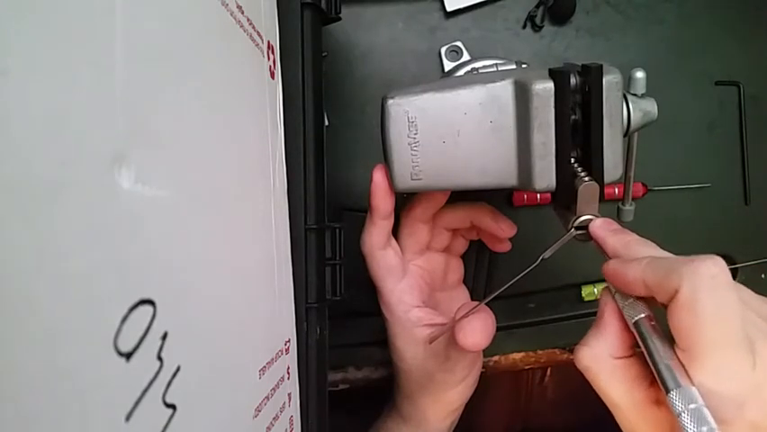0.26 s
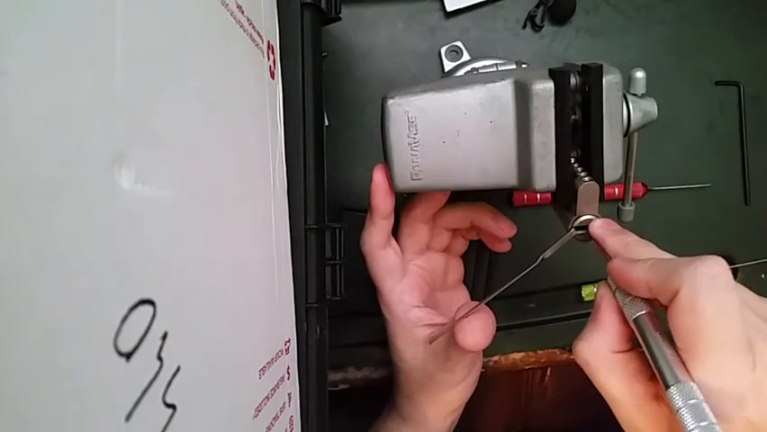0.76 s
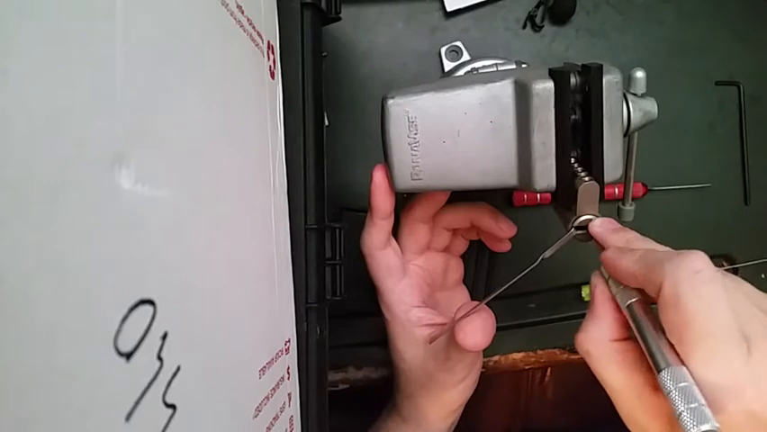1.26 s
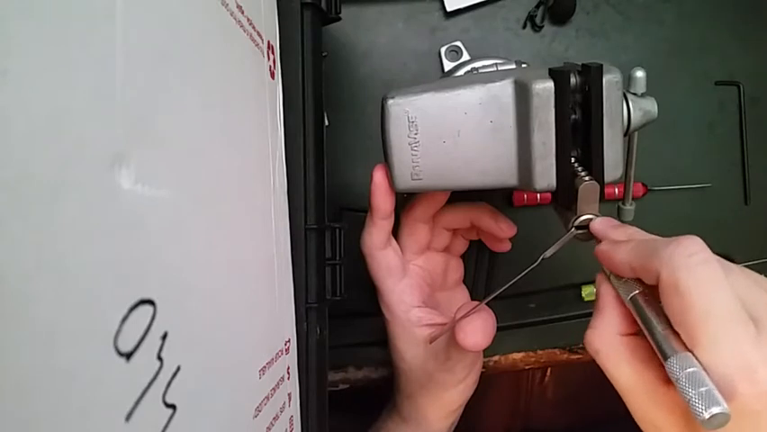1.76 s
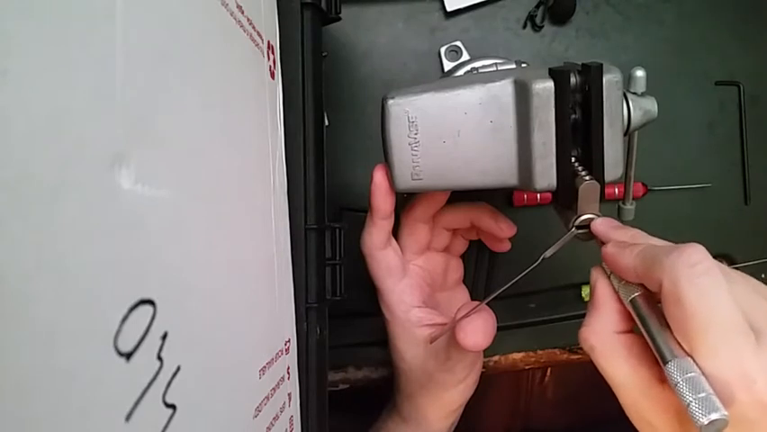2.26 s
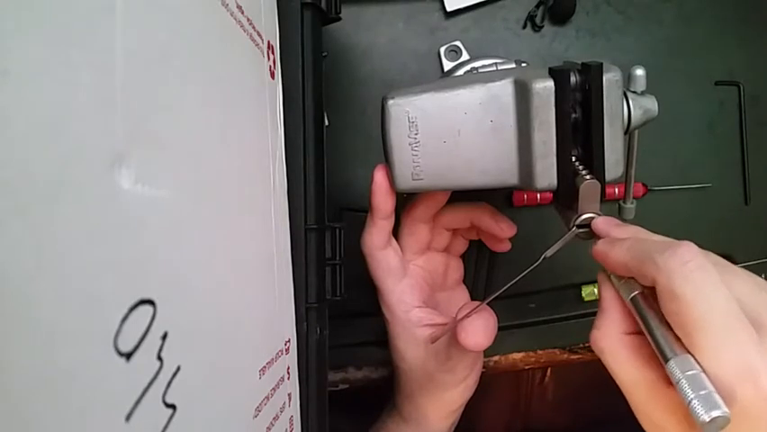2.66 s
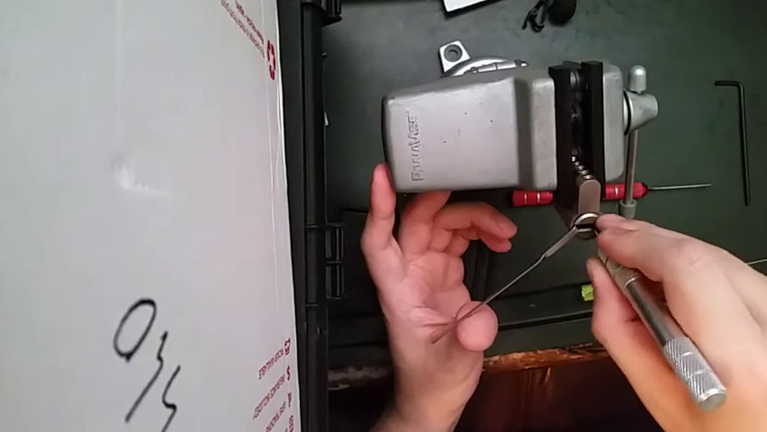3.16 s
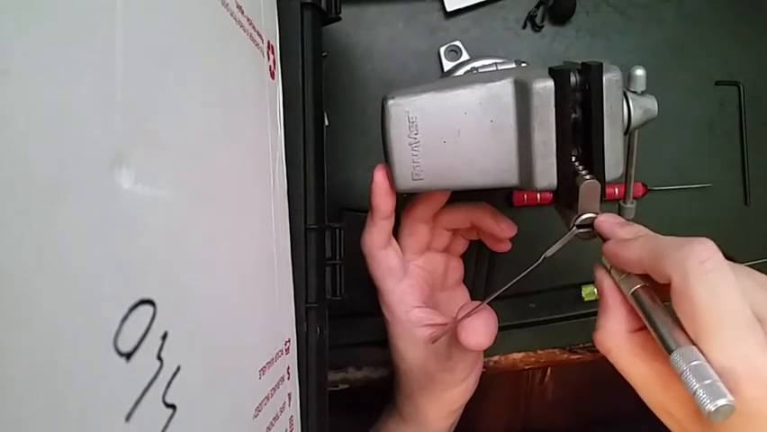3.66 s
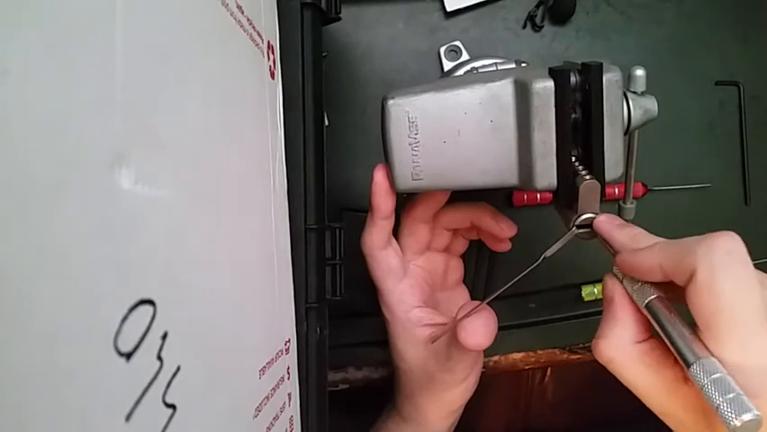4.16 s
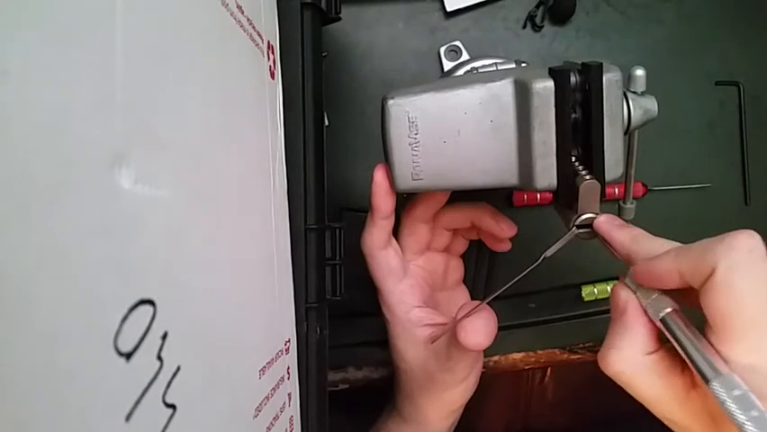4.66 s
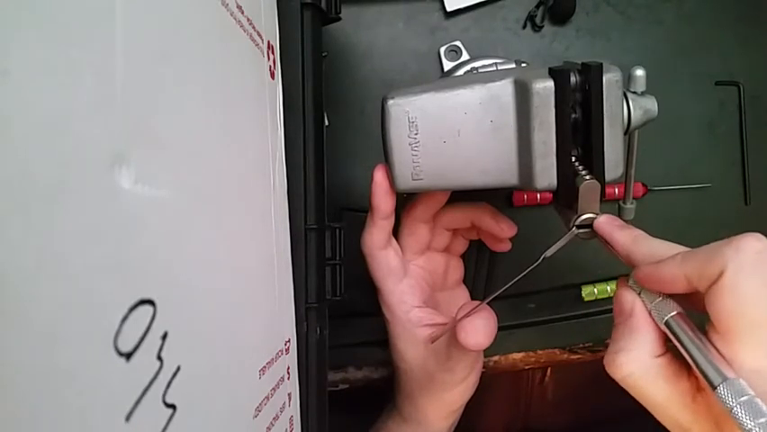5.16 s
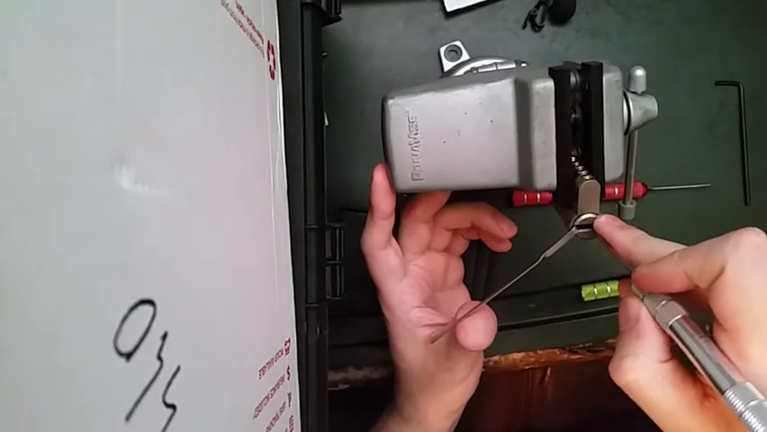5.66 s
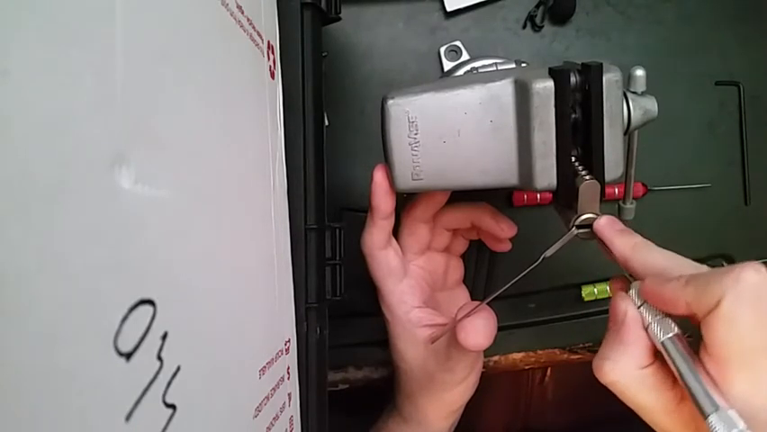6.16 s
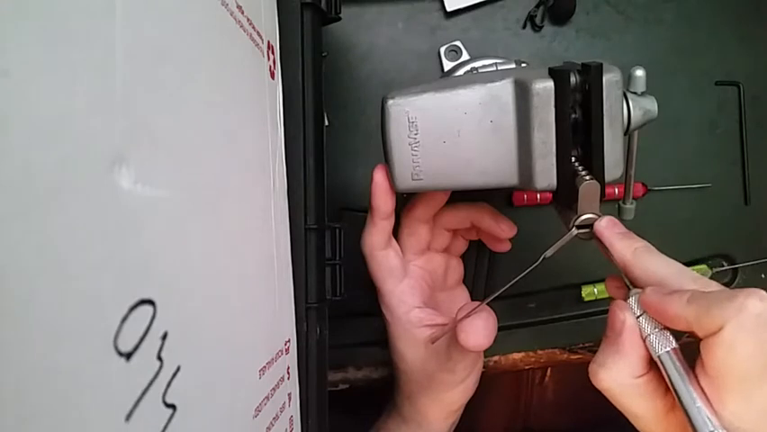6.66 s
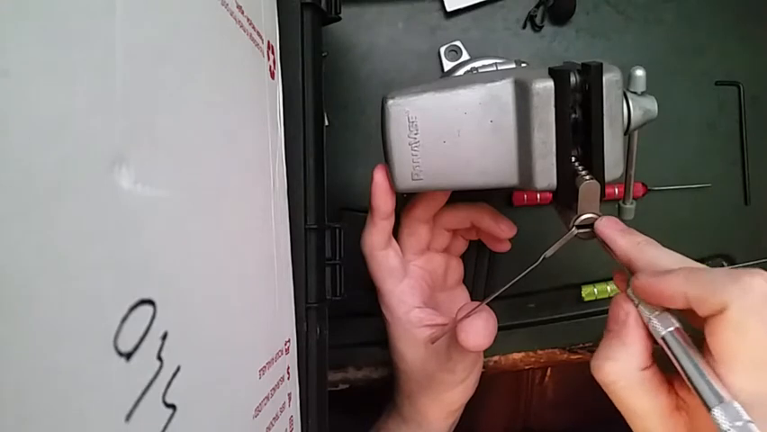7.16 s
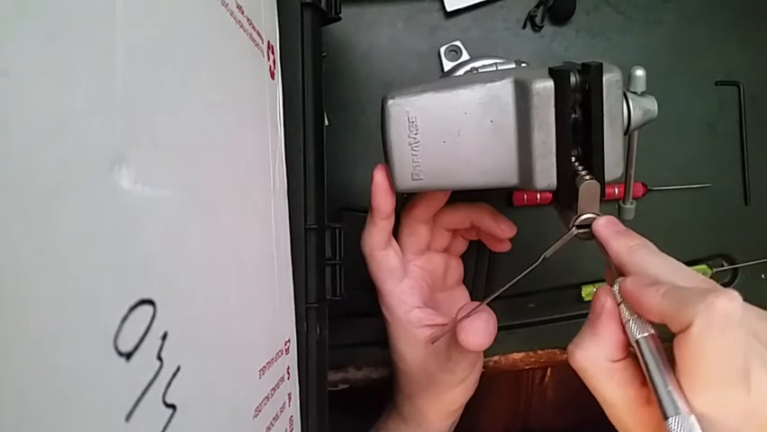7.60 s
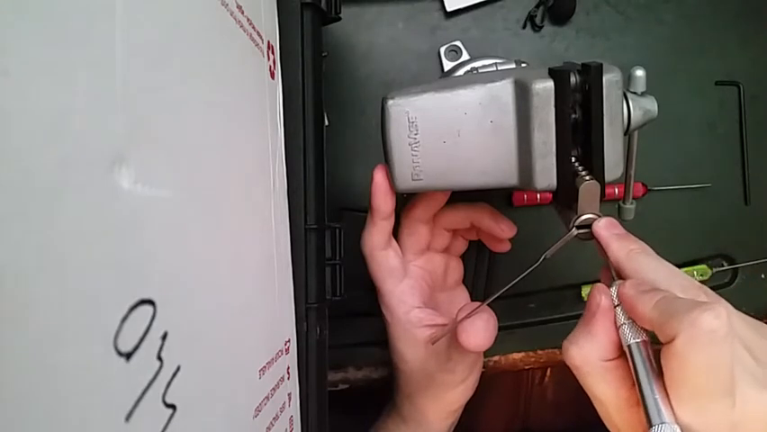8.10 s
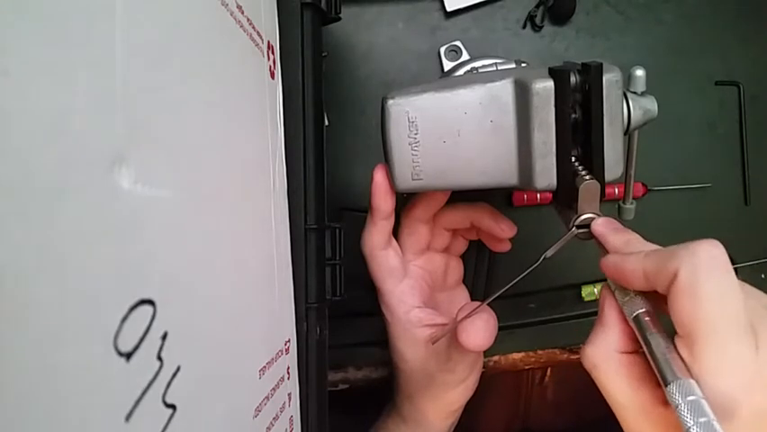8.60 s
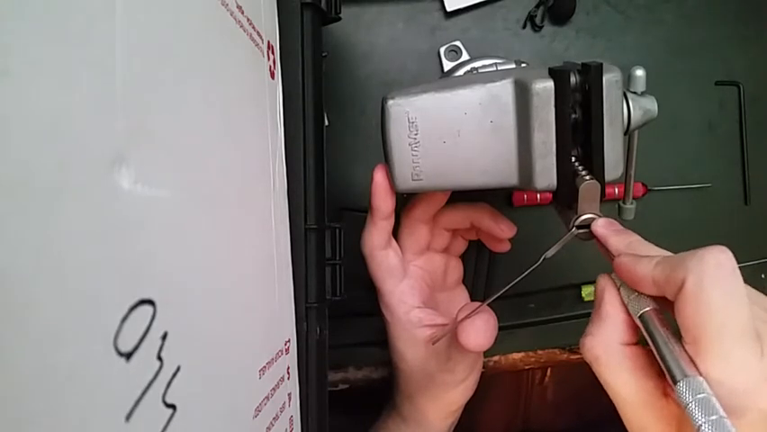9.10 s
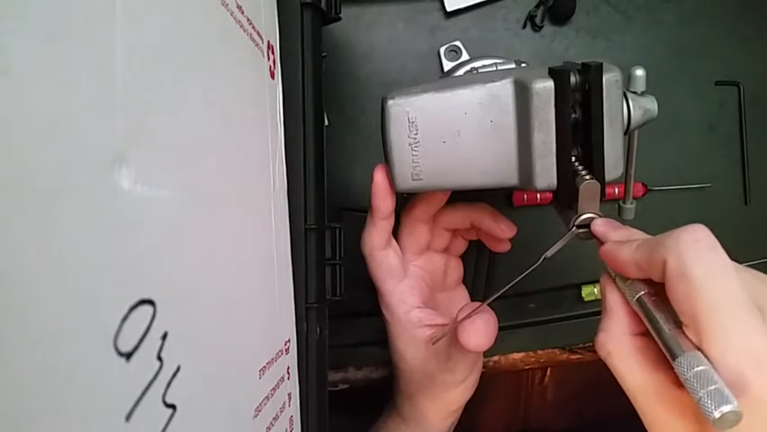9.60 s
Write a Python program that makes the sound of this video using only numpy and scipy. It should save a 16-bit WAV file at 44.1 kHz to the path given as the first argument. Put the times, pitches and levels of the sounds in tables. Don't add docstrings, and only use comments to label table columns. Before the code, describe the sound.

Sparse lock picking sounds: one crisp click at the start, faint ticks and muffled bench bumps, then stronger snaps in the middle and a tight cluster of loud clicks late, ending with more clicks and knocks. Each is dry, bright and tiny, with a short room reflection. Steady low hum and fan drone sit beneath microphone hiss with a thin whistle on the left.

```python
import sys
import numpy as np
from scipy import signal
from scipy.fft import rfft, irfft
from scipy.io import wavfile
from scipy.ndimage import uniform_filter1d

SR = 44100
rng = np.random.default_rng(int(sys.argv[2]) if len(sys.argv) > 2 else 0)


def to_wav(s):
    ch = np.atleast_2d(s).T
    pcm = np.round(np.clip(ch, -1, 1) * 32767)
    wavfile.write(sys.argv[1], SR, pcm.astype(np.int16))


def how_loud(loudness_db):
    steps = np.asarray(loudness_db, float) / 20
    return 10 ** steps


N = 433944

# t/s, peak level/dB, low ring level/dB (relative), low ring f/Hz, strongest high ring f/Hz
PIN_CLICKS = [(0.112, -12.5, -13, 5400, 12100), (0.9641, -33.5, -6.5, 5400, 14250),
              (1.0792, -31, -10, 6200, 15400), (1.335, -35.5, -18, 5970, 15100),
              (1.3517, -31, -11.5, 6240, 9500), (3.2818, -17, -11.5, 5480, 8800),
              (3.7829, -28, -5.5, 5180, 13880), (3.7862, -27.5, -10, 6070, 8580),
              (3.794, -31.5, -9, 5300, 11400), (3.9635, -33, -9, 6100, 8800),
              (4.522, -33.5, -13, 6110, 10400), (4.5766, -29.5, -9, 6110, 9700),
              (6.4034, -13, -11, 5200, 13600), (7.2485, -39, -9, 6100, 9410),
              (7.296, -24.5, -3.5, 5200, 9740), (7.8, -13, -6.5, 5990, 11800),
              (7.8755, -12.5, -9.5, 6070, 13300), (7.8779, -24.5, -20, 5600, 15400),
              (7.882, -21, -10.5, 5870, 13600), (9.0025, -35, -5.5, 5840, 8350),
              (9.191, -19.5, -7.5, 5000, 14000), (9.1928, -17, -10.5, 5660, 12500),
              (9.371, -49.5, 0, 6100, 8600), (9.388, -32, -11, 6200, 8600)]
# t/s, peak level/dB
FAINT_CLICKS = [(1.5383, -55), (1.8902, -44), (2.6126, -43), (2.819, -43), (3.6785, -50), (3.8387, -48),
                (3.9413, -41.5), (4.73, -42), (4.765, -44), (4.885, -46), (4.961, -40), (5.3786, -48),
                (6.6582, -51), (7.226, -45), (8.4124, -45), (8.4594, -59), (8.8382, -53), (9.163, -55),
                (9.8194, -44.5)]
# f/Hz, level/dB, t60/s
LOCK_LOW_MODES = [(4950, -11, .01), (5400, -14, .01), (6550, -18, .01), (7280, -22, .02)]
LOCK_HIGH_MODES = [(7300, -10, .018), (7750, -6, .012), (8530, -9, .035), (10400, -5, .01),
                   (11500, -4, .015), (11750, -6, .02), (12150, -5, .012), (13600, -5, .025),
                   (15400, -6, .01)]
# f/Hz, level/dB
CRACK_SPECTRUM = [(500, -65), (1500, -68), (3000, -12.5), (4500, 4), (7000, 2), (9000, 1), (13000, 5.5),
                  (16000, 6.5)]
# t/s, peak level/dB, upper and lower rings level/dB (relative), strongest upper ring f/Hz
JAW_KNOCKS = [(0.1153, -40.5, 0.5, -19, 3160), (0.964, -55, -2, 5, 2450), (1.0812, -46.5, -5.5, -12, 2400),
              (1.3527, -43.5, -13, -14, 2400), (3.2844, -36, -3.5, -24, 2300), (3.7858, -46, -5, 6, 2470),
              (3.798, -40.5, -6, 1, 2200), (3.945, -56, -7, -19, 2350), (3.9669, -42, -10, -9, 2400),
              (4.5251, -56, -2, -14, 2300), (4.58, -45.5, -7, -29, 2400), (6.4048, -56, 11, -15, 3140),
              (7.249, -58.5, 2, 3, 3100), (7.2989, -48.5, -2, 6, 2380), (7.8002, -41.5, -6, 0, 3150),
              (7.876, -35, -3, -9, 3120), (7.8835, -41, 2, -6, 2520), (9.0052, -48.5, -9, 6.5, 2300),
              (9.1672, -47, -8, 5, 2300), (9.194, -35, -4, 1, 2520), (9.3732, -41.5, -10, -14, 2390),
              (9.3894, -39, -9, -21, 3100)]
# t/s, peak level/dB
JAW_NUDGES = [(1.2231, -62), (1.337, -55), (1.896, -57.5), (1.994, -64), (2.2997, -59), (2.617, -56),
              (2.817, -56), (4.7294, -62.5), (4.7743, -62), (4.9624, -60), (8.9096, -56)]
# f/Hz, level/dB, t60/s
JAW_UPPER_MODES = [(2050, -3, .012), (2350, -1, .015), (2600, -2, .012), (2850, -4, .01), (3080, -2, .015),
                   (3550, -3, .01)]
JAW_LOWER_MODES = [(880, -2, .02), (1080, 0, .02), (1290, -1, .025)]
# t/s, peak level/dB, upper modes level/dB, extra upper ring f/Hz
BENCH_THUDS = [(0.963, -38, 2.5, 544), (1.887, -28.5, -32, 300), (1.998, -26.5, -15, 300),
               (2.294, -36, -9, 450), (2.615, -34.5, -11, 520), (3.284, -32, -9, 396),
               (3.784, -22, -22, 487), (3.797, -23, -4, 367), (4.968, -30.5, -8.5, 514),
               (7.873, -29.5, -9, 560), (8.91, -34, -6, 510), (8.955, -40, -1, 302),
               (9.002, -23, -13.5, 447), (9.163, -36.5, -3, 700), (9.195, -34, 1, 550),
               (9.372, -28.5, -21, 300)]
# t/s, peak level/dB
BENCH_SWAYS = [
    (3.82, -42),
    (9.04, -49),
    (9.38, -57),
]
# f/Hz, level/dB, t60/s
BENCH_LOW_MODES = [(60, -25, 0.23), (81, -41, 0.45), (133.2, -3, 0.24), (213.4, -3.5, 0.23)]
BENCH_HIGH_MODES = [(355, -4, 0.29), (383, -10, 0.39), (473, -6, 0.13), (531, 4, 0.069), (680, -10.5, 0.12),
                    (960, 6, 0.054)]
# f/Hz, level/dB
RIGHT_SHADOW = [(300, -4), (1600, -6), (3000, -44), (4500, -29), (6500, -44), (8500, -23), (12000, -25),
                (16000, -25)]
# f/Hz, t60/s
ROOM_T60 = [(300, 0.065), (1500, 0.37), (4000, 0.23), (9000, 0.19), (16000, 0.11)]
# f/Hz, level/dB
WALLS_LEFT_DB = [(1000, 2.5), (3000, 10.5), (5500, -4.5), (9000, 1.5), (15000, -6)]
WALLS_RIGHT_DB = [(1000, 3), (3000, 3.5), (4500, -17), (6500, -16), (9000, -3), (13000, -0.5), (16000, 3)]
# left level/dB, right level/dB, t60/s
CLUTTER = [(12.5, -11, 0.094)]
# left level/dB, right level/dB
ROOM_LEVELS = [(-4, 4.5)]
# f/Hz, rms level/dB, width/Hz, left lead/rad
HUM_LINES = [(119.2, -55.5, 1.1, 0.63), (239.7, -71, 0.68, 0.73), (380, -66.5, 3.5, 1),
             (485, -72, 12, 0.96)]
FAN_MOANS = [(136.5, -55.5, 8.3, 0.9), (52.6, -62, 8.4, 2.25), (185.7, -66, 5.4, 0.38)]
# f/Hz, density/dB per Hz
AIR_RIGHT = [(20, -70), (48, -80), (80, -80), (106, -82), (170, -73), (260, -81.5), (400, -81.5),
             (700, -89), (900, -95.5), (2000, -100), (4000, -108), (6500, -114), (9000, -109),
             (15800, -103)]
# f/Hz, level/dB
LEFT_PORT_DB = [(60, -6), (200, -4), (500, -1.5), (2200, 1), (3000, 4), (3600, 14.5), (4250, 26),
                (4700, 22.5), (5200, 14.5), (6100, 15.5), (6600, 8.5), (7300, 9), (8200, 1), (12000, 0)]
# f/Hz, likeness/1
AIR_LIKENESS = [(40, 0.25), (130, 0.33), (300, 0.92), (640, 0.041), (1400, 0.035), (6500, 0.051),
                (8500, 0.9), (15000, 0.96)]

FAINT_LOW_HZ, FAINT_TOP_HZ = (4850, 6100), (8360, 15400)
FAINT_LOW_DB = -5.5
HIGH_RING_DB = -4
DEEP_HZ, FRONT_HZ = 5400, 6000
DEEP_BUILD_S, FRONT_BUILD_S, RATTLE_S = 0.0028, 0.001, 0.00098
CREEP_FROM_DB, CREEP_FULL_DB = -26, -18
JAW_HZ, JAW_T60_S = 1696, 0.043
JAW_SAG_HZ_PER_DB, JAW_SAG_FROM_DB = 8.5, -4
NUDGE_UPPER_DB, NUDGE_LOWER_DB, NUDGE_TOP_HZ = -4.5, -1, 2350
JAW_TO_ROOM_DB = -10
PORT_DELAY_SAMPLES = 14


def rms_one(x):
    return x / np.sqrt(np.mean(x ** 2) + 1e-30)


def peak_one(x):
    return x / np.abs(x).max()


def read(points, hz):
    f, value = np.transpose(points)
    return np.interp(np.log(hz + 1), np.log(f + 1), value)


def add(mix, s, sound):
    part = mix[max(round(s * SR), 0):][:len(sound)]
    part += sound[:len(part)]


def colour(x, points):
    hz = np.abs(np.fft.fftfreq(4096, 1 / SR))
    log_gain = np.log(how_loud(read(points, hz)))
    phase = -signal.hilbert(log_gain).imag
    taps = np.fft.ifft(np.exp(log_gain + 1j * phase)).real[:2048]
    return signal.oaconvolve(x, taps)[:N]


def ring(modes, chance, spread_db, size):
    t = np.arange(size) / SR
    hz, db, t60 = np.transpose(modes)[:, :, None]
    chance = chance[:len(modes), None]
    hz = hz * (1 + 0.004 * chance[::-1])
    envelope = how_loud(db + spread_db * chance - 60 * t / t60)
    return (envelope * np.sin(2 * np.pi * hz * t)).sum(0)


def flattened(contacts):
    z = rfft(contacts, 1024)
    return irfft(z / np.abs(z) ** 0.75)[:len(contacts)]


def click(row, chance, grit):
    s, peak_db, low_db, low_hz, top_hz = row
    depth = np.interp(low_hz, (DEEP_HZ, FRONT_HZ), (1, 0))
    creep = depth * np.interp(peak_db, (CREEP_FROM_DB, CREEP_FULL_DB), (0, 1))
    build_s = FRONT_BUILD_S + creep * (DEEP_BUILD_S - FRONT_BUILD_S)
    u = np.arange(len(grit)) / SR / build_s
    envelope = np.where(u < 1, u ** 0.28, np.exp(-(u - 1) * build_s / RATTLE_S))
    contacts = grit * np.abs(grit) * envelope
    contacts[np.argmax(u >= 1)] = 2.2
    contacts = flattened(contacts)
    high = ring(LOCK_HIGH_MODES + [(top_hz, 1, 0.014)], chance, 2, size=2048)
    low = ring(LOCK_LOW_MODES + [(low_hz, 0, 0.006)], chance[14:], 2, size=2048)
    low = np.diff(low, prepend=0)
    high = np.diff(high, prepend=0)
    crack = colour(np.array([1.0]), CRACK_SPECTRUM)
    high, low, crack = (rms_one(signal.fftconvolve(contacts, body)) for body in (high, low, crack))
    bright = crack + how_loud(HIGH_RING_DB) * high
    sound = (bright + how_loud(low_db + 3.0) * low) / np.abs(bright).max()
    return s - 0.0006, how_loud(peak_db + 10.0) * sound


def faint_click(s, peak_db, where):
    low_hz = np.interp(where[0], (0, 1), FAINT_LOW_HZ)
    top_hz = np.interp(where[1], (0, 1), FAINT_TOP_HZ)
    return s, peak_db, FAINT_LOW_DB, low_hz, top_hz


def knock(row, chance, grit):
    s, peak_db, upper_db, lower_db, top_hz = row
    main_hz = JAW_HZ - JAW_SAG_HZ_PER_DB * max(lower_db - JAW_SAG_FROM_DB, 0)
    push = flattened(grit * np.exp(-np.arange(len(grit)) / SR / 0.0025))
    main = ring([(main_hz, 0, JAW_T60_S)], chance, 0, size=3072)
    upper = ring(JAW_UPPER_MODES + [(top_hz, 1, 0.016)], chance, 2, size=3072)
    lower = ring(JAW_LOWER_MODES, chance[5:], 2, size=3072)
    main, upper, lower = (peak_one(signal.fftconvolve(push, body)) for body in (main, upper, lower))
    sound = main + how_loud(upper_db + 9.0) * upper + how_loud(lower_db + 4.5) * lower
    return s - 0.0003, how_loud(peak_db + 4.5) * sound


def thud(row, chance):
    s, peak_db, bright_db, top_hz = row
    push = signal.windows.hann(90)
    low = peak_one(ring(BENCH_LOW_MODES, chance, 2, size=9000))
    high = peak_one(ring(BENCH_HIGH_MODES + [(top_hz, 2, 0.07)], chance[4:], 2, size=9000))
    body = low + how_loud(bright_db + 14.5) * high
    return s, how_loud(peak_db - 7.0) * signal.fftconvolve(body, push / push.sum())


def sway(s, peak_db):
    t = np.arange(SR // 2) / SR
    envelope = how_loud(peak_db - 60 * t / 0.59) * np.minimum(t / 0.034, 1)
    return s, envelope * np.sin(2 * np.pi * 43.0 * t)


def room(x):
    out = np.zeros((2, N))
    turn = np.arange(N) / SR * 1.3
    left_db, right_db, clutter_t60_s = CLUTTER[0]
    clutter_db = np.reshape([left_db, right_db], (2, 1, 1))
    for k in range(3):
        taps = np.zeros((2, 9000))
        at = np.arange(60, 8980, 12) + rng.integers(0, 12, (2, 744))
        np.put_along_axis(taps, at, rng.choice([-1., 1.], at.shape), 1)
        hz, t, z = signal.stft(taps, SR, nperseg=128)
        far = how_loud(-60 * t / read(ROOM_T60, hz)[:, None])
        near = how_loud(clutter_db - 60 * t / clutter_t60_s)
        tail = signal.istft(z * (far + near), SR, nperseg=128)[1]
        tail = tail / np.linalg.norm(tail[0])
        share = np.sqrt(2 / 3) * np.cos(2 * np.pi * (turn + k / 3))
        out += signal.fftconvolve((x * share)[None], tail, axes=1)[:, :N]
    return out * how_loud(ROOM_LEVELS).T


def moan(hz, db, width_hz, lead_rad, steady):
    r = np.exp(-np.pi * width_hz / SR)
    noise = rng.standard_normal((2, N + SR))
    wander = rms_one(signal.lfilter([1], [1, -2 * r, r * r], noise)[:, SR:])
    carrier = np.exp(2j * np.pi * (hz * np.arange(N) / SR + rng.random()))
    line = carrier * (steady + wander[0] + 1j * wander[1])
    return how_loud(db) * rms_one(np.array([line, line * np.exp(-1j * lead_rad)]).real)


def air():
    frames, hz = N // 512 + 5, np.fft.rfftfreq(2048, 1 / SR)
    a, b, c, d, patches = rng.standard_normal((frames, 1025, 5)).T
    patches = rms_one(uniform_filter1d(uniform_filter1d(patches, 20, 0), 8, 1))
    same = np.clip(read(AIR_LIKENESS, hz), -1, 1)[:, None]
    right = a + 1j * b
    left = same * right + np.sqrt(1 - same ** 2) * (c + 1j * d)
    z = np.array([left * how_loud(read(LEFT_PORT_DB, hz))[:, None], right])
    z *= how_loud(read(AIR_RIGHT, hz)[:, None] + 1.15 * patches + 15.0)
    return signal.istft(z, nperseg=2048, noverlap=1536)[1][:, :N]


def scene():
    clicks, knocks, thuds = np.zeros((3, N))

    touches = rng.random((len(FAINT_CLICKS), 2))
    rows = PIN_CLICKS + [faint_click(*row, where) for row, where in zip(FAINT_CLICKS, touches)]
    chances, grits = rng.standard_normal((len(rows), 21)), rng.standard_normal((len(rows), 500))
    for row, chance, grit in zip(rows, chances, grits):
        add(clicks, *click(row, chance, grit))

    rows = JAW_KNOCKS + [(*row, NUDGE_UPPER_DB, NUDGE_LOWER_DB, NUDGE_TOP_HZ) for row in JAW_NUDGES]
    chances, grits = rng.standard_normal((len(rows), 8)), rng.standard_normal((len(rows), 300))
    for row, chance, grit in zip(rows, chances, grits):
        add(knocks, *knock(row, chance, grit))

    for row, chance in zip(BENCH_THUDS, rng.standard_normal((len(BENCH_THUDS), 11))):
        add(thuds, *thud(row, chance))
    for row in BENCH_SWAYS:
        add(thuds, *sway(*row))

    left = clicks + knocks
    right = np.roll(colour(left, RIGHT_SHADOW), PORT_DELAY_SAMPLES)
    wet = room(clicks + how_loud(JAW_TO_ROOM_DB) * knocks)
    wet = np.array([colour(wet[0], WALLS_LEFT_DB), colour(wet[1], WALLS_RIGHT_DB)])
    thuds = np.array([thuds, np.roll(thuds, PORT_DELAY_SAMPLES)]) * how_loud([[-1.5], [1.5]])
    hum = sum(moan(*line, steady=7.7) for line in HUM_LINES)
    drone = sum(moan(*line, steady=0.32) for line in FAN_MOANS)
    return np.array([left, right]) + wet + thuds + (hum + drone) * how_loud([[0.5], [-0.5]]) + air()


def band_limit(x):
    return signal.sosfilt(signal.butter(12, 16860, fs=SR, output="sos"), x)


def record(dry):
    bass_cut = signal.butter(6, 39, "high", fs=SR, output="sos")
    top_edge = signal.firwin(301, 15950, window=("kaiser", 5), fs=SR)
    mix = signal.sosfilt(bass_cut, dry)
    mix = signal.oaconvolve(mix, top_edge[None], "same")
    return band_limit(mix)


dry = scene()
out = record(dry)
to_wav(out)
```